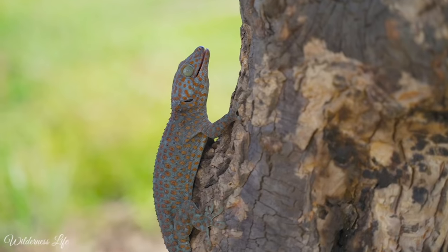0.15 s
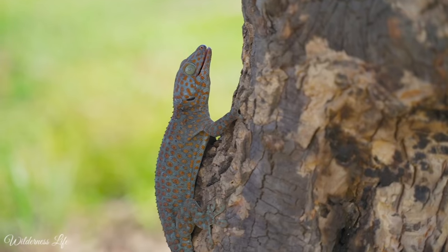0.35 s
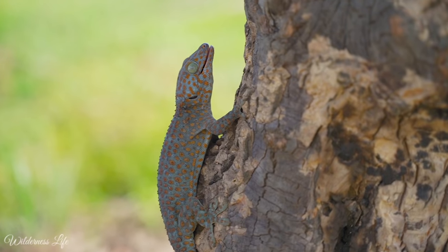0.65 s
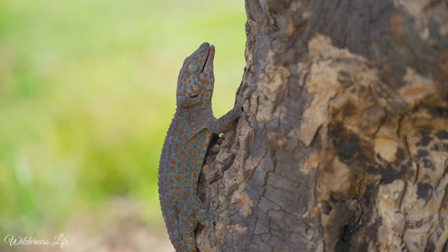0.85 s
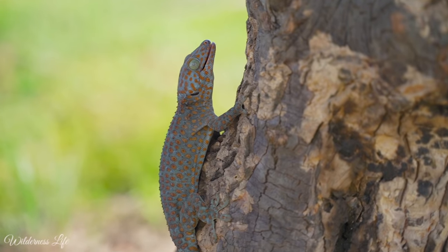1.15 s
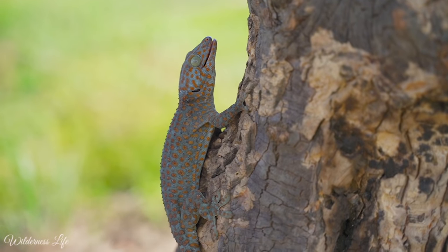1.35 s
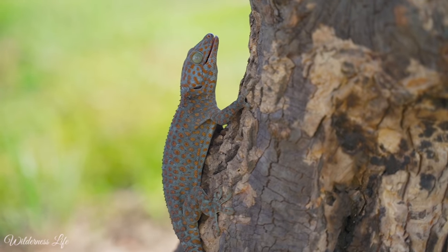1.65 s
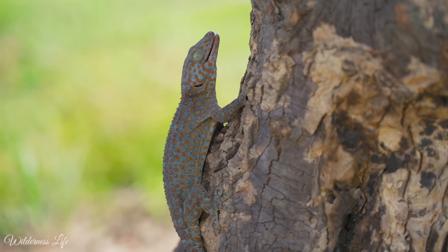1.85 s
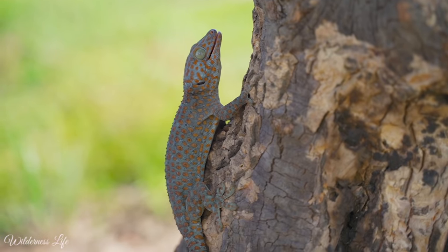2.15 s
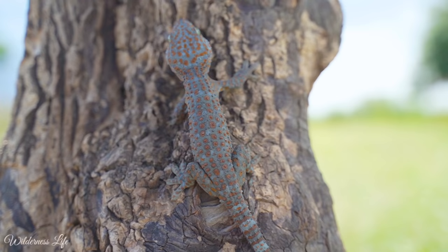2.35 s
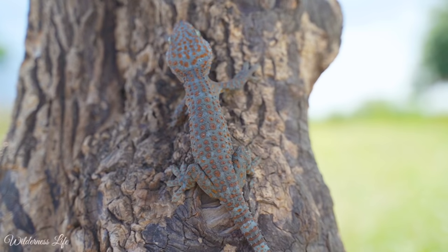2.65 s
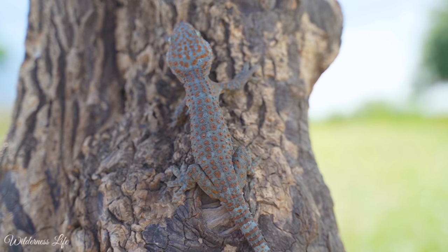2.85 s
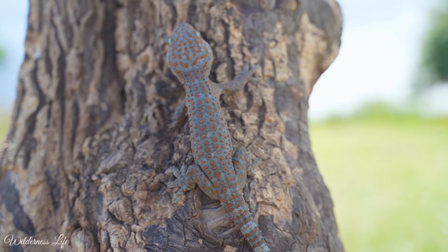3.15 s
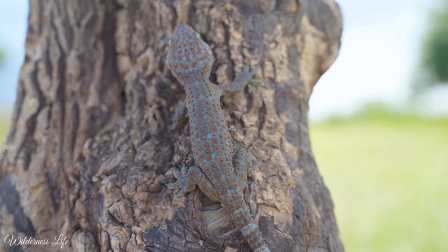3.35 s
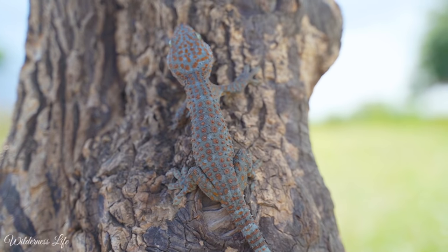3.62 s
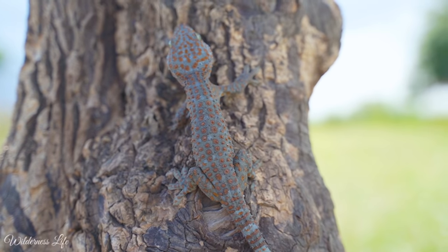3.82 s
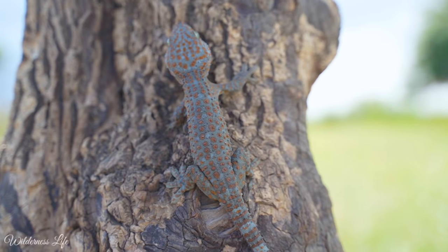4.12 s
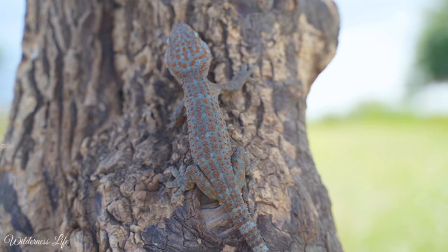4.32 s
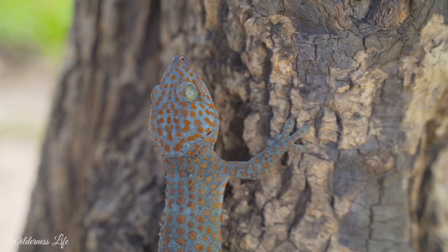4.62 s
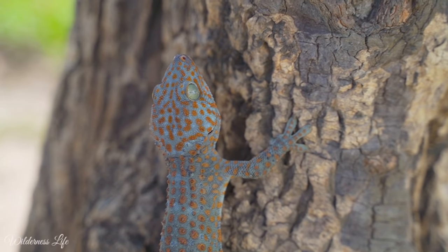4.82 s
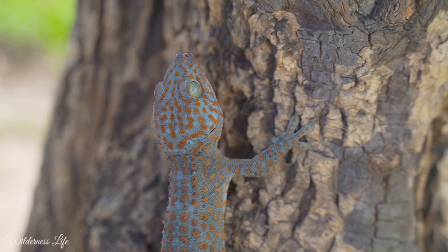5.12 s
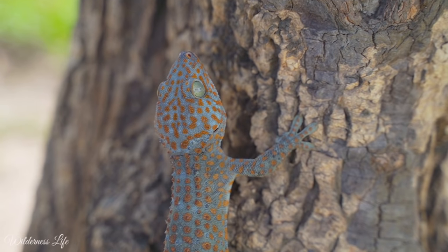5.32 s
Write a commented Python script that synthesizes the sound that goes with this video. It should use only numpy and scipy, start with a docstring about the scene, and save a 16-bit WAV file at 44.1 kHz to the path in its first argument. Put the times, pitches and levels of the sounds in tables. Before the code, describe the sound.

A nearby gecko calls right at the start: a rattling run of ten short croaks, about ten a second, ending at 1 second in a soft, falling sigh. The call has a slight outdoor echo. Underneath, wind rumbles low with a light hiss throughout, and faint, high insects buzz in phrases. A distant bird whistles at about 1.3 seconds, and more short gliding notes follow between 2.3 and 3.4 seconds. From about 1.5 seconds dry grass rustles lightly, then stalks tick and snap, most sharply near 3.5 seconds. At 3.7 seconds the gecko gives a second run of ten croaks, a little louder, the croaks growing longer before another brief sigh at about 4.6 seconds. The wind is slightly stronger by now, and it continues with a few small ticks and faint bird notes until the end at about 5.5 seconds.

```python
"""Dry grassland: a gecko on a tree trunk rattles twice, each call a run of croaks ending in a sigh.
Each croak is a train of glottal clicks ringing a small mouth and throat; nearby surfaces throw it back.
Behind it wind rumbles and hisses, insects sing in two high noise bands, far birds whistle short
gliding notes, and dry grass rustles and ticks as stalks snap."""
import sys
import numpy as np
from scipy import signal
from scipy.fft import rfft, irfft
from scipy.io import wavfile
from scipy.ndimage import uniform_filter1d

SR = 44100
rng = np.random.default_rng(int(sys.argv[2]) if len(sys.argv) > 2 else 0)


def to_wav(s):
    """Save 16-bit WAV."""
    ch = np.atleast_2d(s).T  # columns
    pcm = np.round(np.clip(ch, -1, 1) * 32767)  # PCM
    wavfile.write(sys.argv[1], SR, pcm.astype(np.int16))


N = 241570

# Click trains (start [s], length [ms], start rate [Hz], top rate [Hz], end rate [Hz],
# top position [share of length], click level before the resonances [dB], tilt start to end [dB])
CROAKS = [(0.0057, 22.8, 109.4, 307, 390, 0.81, -9.5, -5), (0.1378, 22, 191, 320, 410, 0.97, -8, -3.5),
          (0.2584, 24, 172, 258, 114, .5, -7, -1), (0.3713, 24.5, 188.5, 248, 160, 0.47, -7, -2),
          (0.4803, 27.1, 189, 380, 150, 0.56, -6.5, -1), (0.5885, 29, 222, 350, 210, .6, -7.5, -8.5),
          (0.6852, 29.4, 212.4, 385, 212, 0.61, -7.5, -4), (0.783, 26.5, 218.6, 410, 186, 0.52, -6.5, -0.5),
          (0.8792, 29, 388, 382, 314, 0.14, -9.5, -4), (0.9669, 26.2, 386, 377, 280, 0.16, -14.5, -1.5),
          (3.7237, 23.6, 176.7, 243, 91, 0.44, -6.5, -6.5), (3.8264, 25.7, 236, 313, 140, 0.57, -5, -3),
          (3.933, 32.4, 289.7, 310, 130, 0.6, -3.5, -7), (4.034, 32, 326, 450, 113, .4, -5.5, 2),
          (4.1252, 36.5, 302, 438, 280, 0.38, -3.5, 0.5), (4.2255, 34.8, 315, 480, 220, 0.42, -3.5, 0),
          (4.312, 49.6, 305, 438, 237, 0.54, -4.5, 6), (4.4126, 46.4, 244.7, 453, 244, 0.5, -6.5, 3),
          (4.5008, 52, 230, 443, 230, 0.55, -7, 0), (4.5979, 59.5, 139, 440, 290, .4, -10.5, 1.5)]
# Voice of each call at USUAL_DB (from [s], mouth [Hz], throat [Hz], throat trim [dB])
CALL_VOICES = [(0, 2316, 1142, -2.5), (3.7, 2248, 1096, -6.5)]
# Fixed side resonances (centre [Hz], width [Hz], gain re throat [dB])
CHEST_MODES = [(710, 200, -5), (435, 130, -11), (1720, 200, -9), (3700, 500, -28)]
# Breathy whistles (centre [Hz], width [Hz], level re strongest click [dB])
RASP_BANDS = [(5750, 2500, -67), (10170, 430, -65.5), (12700, 460, -65), (15200, 600, -68)]
# Voiced call endings (start [s], length [s], start pitch [Hz], end pitch [Hz], rms at the crest [dB])
SIGHS = [(0.983, 0.0618, 345.3, 240, -29), (4.634, 0.0543, 409.6, 260, -24)]
# Sigh harmonics, fundamental first (relative level [dB])
SIGH_PARTIALS_DB = [-6, 2, -5, -11, -18, -17, -13, -13]
# Wind strength (time [s], rumble [dB], grass hiss [dB])
WIND_LEVELS = [(0, -32, -44.5), (1.3, -32.5, -48), (2.2, -33.5, -48.5), (2.4, -30, -45.5),
               (3.2, -30.5, -46.5), (3.7, -28.5, -45), (4.7, -29.5, -42), (5.0, -29.5, -47),
               (5.48, -30, -47.5)]
# Wind buffets (time [s], rumble rise [dB])
GUSTS = [(0.06, 0), (3.27, 3.5), (3.69, 3.5), (5.19, 3)]
# Wind rumble colour (frequency [Hz], relative density [dB])
RUMBLE_SPECTRUM = [(12, -43), (20, -29), (43, -2.5), (129, 0.5), (145, -2), (178, -9), (206, -11),
                   (317, -22), (450, -28), (580, -26), (990, -120)]
# Grass hiss colour (frequency [Hz], relative density [dB])
HISS_SPECTRUM = [(150, -24), (300, -9.5), (600, -0.5), (1200, -2), (2000, -6.5), (3200, -4.5), (4500, -12),
                 (6500, -18), (10000, -18), (16000, -21), (19000, -38)]
# Insect phrases (start [s], end [s], upper song [dB], lower song [dB])
INSECT_PHRASES = [(-.1, 0.518, -62, -63), (.73, 1.672, -61, -63), (1.728, 2.197, -60.5, -64),
                  (2.225, 2.305, -55, -62), (2.5, 2.93, -61, -67), (3.48, 4.424, -63, -65),
                  (4.572, 5.595, -62.5, -65)]
# Whistles (start [s], length [s], bend after [s], start pitch [Hz], bend pitch [Hz], end pitch [Hz],
# rms [dB], waver [dB])
BIRD_NOTES = [(1.276, .009, .004, 5900, 6050, 6200, -49, 1.5),
              (1.337, .125, .016, 3350, 3990, 3930, -45, .4), (2.32, .025, .012, 3100, 2850, 2600, -47, 5),
              (2.39, .08, .03, 2950, 3150, 2750, -47, 5), (2.86, .12, .06, 2200, 2100, 2020, -53, 4),
              (3.25, .055, .027, 4050, 3150, 3050, -46, 4), (3.315, .04, .025, 4150, 3350, 3050, -47, 3),
              (4.78, .04, .025, 1450, 1490, 1580, -47, 4), (5.12, .06, .03, 1850, 1840, 1820, -54, 4),
              (5.32, .09, .04, 1850, 2100, 2050, -56, 4)]
# Grass swells (start [s], length [s], centre [Hz], width [Hz], nominal level [dB])
RUSTLES = [(1.538, 0.14, 3360, 3000, -49), (1.566, 0.054, 503, 500, -48), (1.773, .12, 3600, 2000, -51.5),
           (1.974, 0.065, 3120, 1200, -56), (2.321, 0.11, 1250, 1520, -44), (2.325, 0.22, 3100, 1790, -45),
           (2.548, 0.13, 8600, 2200, -49.5), (2.563, .1, 14500, 2520, -60),
           (2.684, 0.055, 3150, 2420, -41.5), (2.685, 0.053, 1580, 900, -44), (2.75, .09, 3200, 900, -49),
           (2.76, .12, 8700, 1200, -61), (2.863, 0.17, 1100, 1220, -50), (3.222, 0.11, 4600, 9150, -46.5),
           (3.438, 0.025, 2300, 2500, -38.5), (3.46, 0.064, 1850, 3050, -34), (3.56, 0.14, 2500, 3520, -51),
           (4.694, 0.053, 6100, 6100, -45)]
# Stalk snaps (time [s], peak [dB], ring [Hz])
STALK_SNAPS = [(2.406, -24.5, 1450), (2.568, -31, 2500), (2.878, -24.5, 1550), (2.905, -37, 900),
               (2.971, -35, 3160), (3.009, -29, 665), (3.165, -38, 7000), (3.28, -42, 5500),
               (3.399, -33, 2880), (3.469, -19.5, 2390), (3.487, -29, 2500), (3.496, -26, 3400),
               (3.598, -33, 2500), (3.646, -35, 2500), (4.902, -31, 1510), (4.981, -33, 3150),
               (5.03, -32, 1410), (5.16, -37.5, 4500), (5.195, -41, 3000)]
# Brief drops of the background (time [s], half length [ms], amplitude lost [share])
BACKGROUND_DIPS = [(2.292, 4.8, 0.7), (4.497, 11, .6)]

MOUTH_WIDTH_HZ, THROAT_WIDTH_HZ, VOICE_TOP_HZ = 1126, 416, 3350
USUAL_DB, MOUTH_HZ_PER_DB, OPENING_DB_PER_DB = -9, -11, 0.45
FAR_T60_S, NEAR_T60_S, NEAR_RE_FAR_DB, ECHO_RISE_MS = 0.44, 0.048, 8, 5


def gecko():
    """Croaks and sighs with their echo."""
    voice = np.zeros(N)
    for s, *row in CROAKS:
        add(voice, s - .0014, croak(s, *row))  # the ring peaks just after the click
    for s, *row in SIGHS:
        add(voice, s, sigh(*row))
    return echo(voice, db=-5.5)


def glottis(ms, start_hz, top_hz, end_hz, top_at, peak_db, tilt_db,
            edge_db=-11.5, scatter_db=0.9, jitter_cycles=0.008):
    """Clicks at an arching rate, loud trains swelling mid-way. Returns the train and its top gain."""
    t = np.arange(int(.12 * SR)) / SR
    along = t / (ms / 1000)
    top_at = np.clip(top_at, .05, .95)
    from_top = np.interp(along, [0, top_at, 1], [1, 0, 1]) ** 1.9  # rounds the arch
    rate_hz = top_hz + from_top * (np.where(along < top_at, start_hz, end_hz) - top_hz)
    cycles = np.cumsum(rate_hz) / SR
    count = int(np.interp(1, along, cycles) + .3) + 1
    jitter, scatter = rng.standard_normal((40, 2))[:count].T
    click_s = np.interp(np.arange(count) + jitter_cycles * jitter, cycles, t)
    place = 2000 * click_s / ms - 1  # -1 at the start, 1 at the end
    swell_db = min(edge_db - peak_db, 0) * abs(place) ** 1.46
    gains = undb(peak_db + swell_db + tilt_db * place / 2 + scatter_db * scatter)
    lag_samples = (t[:, None] - click_s) * SR - 8
    impulses = np.sinc(lag_samples) * np.exp(-lag_samples ** 2 / 18)
    return impulses @ gains, gains.max()


def croak(s, ms, start_hz, top_hz, end_hz, top_at, peak_db, tilt_db):
    """Clicks ring the mouth briefly and the throat longer; air rasps with them."""
    clicks, top_gain = glottis(ms, start_hz, top_hz, end_hz, top_at, peak_db, tilt_db)
    _, mouth_hz, throat_hz, throat_db = [v for v in CALL_VOICES if v[0] <= s][-1]
    # louder croaks open the mouth: its resonance and the throat's share fall
    mouth_hz += MOUTH_HZ_PER_DB * (peak_db - USUAL_DB)
    throat_db -= OPENING_DB_PER_DB * (peak_db - USUAL_DB)
    mouth = ring(clicks, mouth_hz, MOUTH_WIDTH_HZ, order=4)
    throat = ring(clicks, throat_hz, THROAT_WIDTH_HZ)
    throat = ring(throat, throat_hz, width_hz=570, order=2)
    for hz, width_hz, db in CHEST_MODES:
        throat += np.sign(hz - throat_hz) * undb(db) * ring(clicks, hz, width_hz, order=2)
    puffs = uniform_filter1d(clicks, size=150) * rng.standard_normal(len(clicks))
    rasp = sum(undb(db) * unit(ring(puffs, hz, width_hz, order=2)) for hz, width_hz, db in RASP_BANDS)
    # opposite signs dig the valley between the two resonances
    voice = undb(29.5) * mouth - undb(33 + throat_db) * throat
    return signal.sosfilt(signal.butter(2, VOICE_TOP_HZ, fs=SR, output="sos"), voice) + top_gain * rasp


def sigh(length_s, start_hz, end_hz, db):
    """Soft voiced harmonics slide down, swell and fade."""
    along = np.linspace(0, 1, int(length_s * SR))
    phase = 2 * np.pi * np.cumsum(start_hz + (end_hz - start_hz) * along) / SR
    tone = sum(undb(level_db) * np.sin(k * phase) for k, level_db in enumerate(SIGH_PARTIALS_DB, 1))
    return unit(tone) * undb(db) * np.sin(np.pi * along ** 0.96)


def echo(direct, db):
    """Direct sound plus diffuse returns: brief from trunk and ground, longer from far surroundings."""
    t = np.arange(SR // 2) / SR
    rise = 1 - np.exp(-1000 * t / ECHO_RISE_MS)
    fall = undb(-60 * t / FAR_T60_S) + undb(NEAR_RE_FAR_DB - 60 * t / NEAR_T60_S)
    tail = rng.standard_normal(len(t)) * rise * fall
    tail /= np.sqrt(np.sum(tail ** 2))
    return direct + undb(db) * signal.fftconvolve(direct, tail)[:N]


def wind(gust_half_s=0.024):
    """Low rumble with short buffets, plus hiss in the grass."""
    t = np.arange(N) / SR
    times_s, *levels_db = np.transpose(WIND_LEVELS)
    rumble_db, hiss_db = [np.interp(t, times_s, db) for db in levels_db]
    rumble_db += sum(db * bump(t - s, gust_half_s) for s, db in GUSTS)
    rumble = flickering_noise(RUMBLE_SPECTRUM, flicker_db=0.65, rate_hz=6)
    hiss = flickering_noise(HISS_SPECTRUM, flicker_db=1.0, rate_hz=8)
    return rumble * undb(rumble_db) + hiss * undb(hiss_db)


def insects(upper_hz=8180, lower_hz=7260, floor_db=-79.5, fade_s=0.076,
            first_pair_s=.095, period_s=.1175, gap_s=.045, pulse_half_s=.013):
    """Two narrow raspy songs in shared phrases, faint between; the upper throbs in pulse pairs."""
    t = np.arange(N) / SR
    gains = np.full((2, N), undb(floor_db))
    for start_s, end_s, *db in INSECT_PHRASES:
        gate = np.clip(np.minimum(t - start_s, end_s - t) / fade_s + .5, 0, 1)
        gains += undb(db)[:, None] * gate
    since_s = (t - first_pair_s + period_s / 4) % period_s - period_s / 4
    throb = 0.45 + bump(since_s, pulse_half_s) + bump(since_s - gap_s, pulse_half_s)
    upper = unit(throb * ring(rng.standard_normal(N), upper_hz, width_hz=700, order=2))
    lower = unit(ring(rng.standard_normal(N), lower_hz, width_hz=400, order=2))
    return upper * gains[0] + lower * gains[1]


def birds(fade_s=0.0013):
    """Wavering sine glides with one bend, blurred by distance."""
    out, waver = np.zeros(N), wander(rate_hz=200)
    for s, length_s, bend_s, *hz, db, waver_db in BIRD_NOTES:
        t = np.arange(0, length_s, 1 / SR)
        gate = np.clip(np.minimum(t, length_s - t) / fade_s, 0, 1)
        shake_db = waver_db * waver[int(s * SR):][:len(t)]
        glide_hz = np.interp(t, [0, min(bend_s, .9 * length_s), length_s], hz)
        phase = 2 * np.pi * np.cumsum(glide_hz * (1 + 0.00305 * shake_db)) / SR
        add(out, s, np.sqrt(2) * gate * undb(db + shake_db) * np.sin(phase))
    return echo(out, db=-12)


def grass(snap_decay_s=0.0028):
    """Rustles are swells of crackly noise; ticks are single stalks snapping."""
    out = np.zeros(N)
    crackle = rng.standard_normal(N) * undb(2.5 * wander(rate_hz=150))
    for s, length_s, hz, width_hz, db in RUSTLES:
        stretch = crackle[int(s * SR):][:int(length_s * SR)]
        rustle = unit(ring(stretch, hz, width_hz, order=3))
        swell = np.sin(np.linspace(0, np.pi, len(rustle))) ** 0.51
        add(out, s, rustle * swell * undb(db + 1.5))
    t = np.arange(SR // 20) / SR
    for s, db, hz in STALK_SNAPS:
        burst = rng.standard_normal(len(t)) * np.exp(-t / snap_decay_s)
        snap = ring(burst, hz, width_hz=0.64 * hz, order=2)
        add(out, s, snap * undb(db) / abs(snap).max())
    return out


def flickering_noise(spectrum, flicker_db, rate_hz):
    """Coloured noise, rms 1, whose half-octave bands flicker independently."""
    hz, db = np.transpose(spectrum)
    bins_hz = np.fft.rfftfreq(N, 1 / SR) + 1
    colour_db = np.interp(np.log(bins_hz), np.log(hz), db, left=-90, right=-90)
    coloured = rfft(rng.standard_normal(N)) * undb(colour_db)
    out = np.zeros(N)
    for half_octave in np.arange(max(8, int(2 * np.log2(hz[0]))), min(30, 2 * np.log2(hz[-1]))):
        share = np.clip(1 - abs(2 * np.log2(bins_hz) - half_octave), 0, 1)
        out += irfft(coloured * share, N) * undb(flicker_db * wander(rate_hz))
    return unit(out)


def wander(rate_hz):
    """Random steps smoothed twice, rms 1."""
    hold = int(SR / rate_hz)
    steps = np.repeat(rng.standard_normal(N // hold + 1), hold)
    return unit(uniform_filter1d(uniform_filter1d(steps, hold), hold)[:N])


def ring(x, hz, width_hz, order=1):
    """Resonance with centre gain 1, applied order times."""
    b, a = signal.iirpeak(hz, hz / width_hz, fs=SR)
    for _ in range(order):
        x = signal.lfilter(b, a, x)
    return x


def bump(t, half_s):
    """Gaussian, 1 at t = 0."""
    return np.exp(-(t / half_s) ** 2)


def undb(db):
    """Decibels to gain."""
    return 10 ** (np.asarray(db) / 20)


def unit(x):
    """Scale to rms 1."""
    return x / np.sqrt(np.mean(x ** 2))


def add(out, s, piece):
    """Mix a piece in at s seconds."""
    i = max(int(s * SR), 0)
    out[i:i + len(piece)] += piece[:N - i]


def scene():
    """Gecko over a grassland background that dips briefly twice; mono."""
    t = np.arange(N) / SR
    background = wind() + insects() + birds() + grass()
    for s, half_ms, lost in BACKGROUND_DIPS:
        background *= 1 - lost * bump(t - s, half_ms / 1000)
    return (gecko() + background)[None]


def record(dry):
    """Steep low-pass at 15750 Hz."""
    return signal.sosfilt(signal.ellip(10, .2, 70, 15750, fs=SR, output="sos"), dry)


dry = scene()
out = record(dry)
to_wav(out)
```